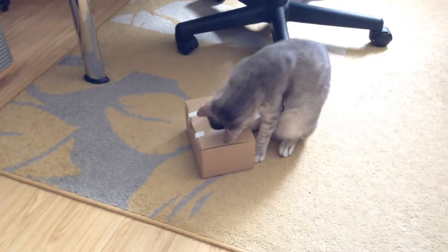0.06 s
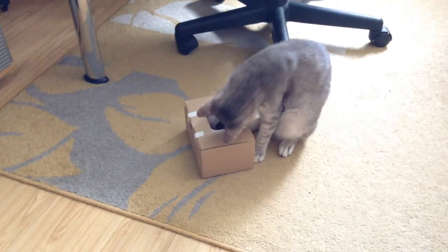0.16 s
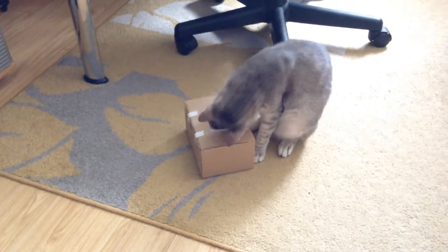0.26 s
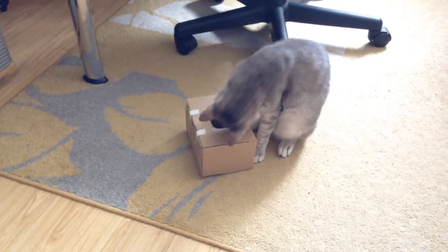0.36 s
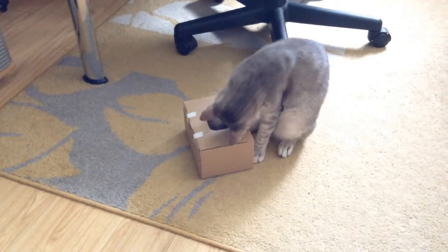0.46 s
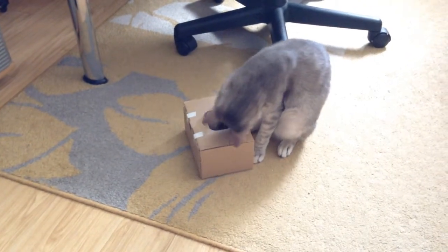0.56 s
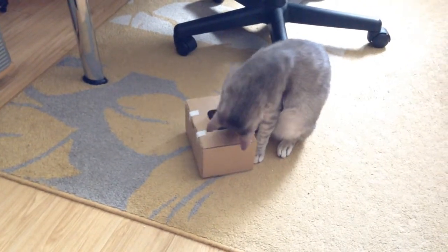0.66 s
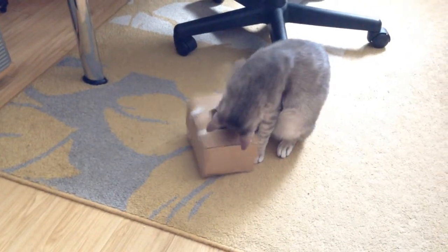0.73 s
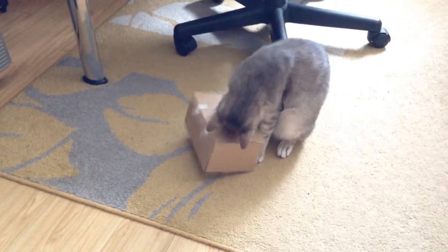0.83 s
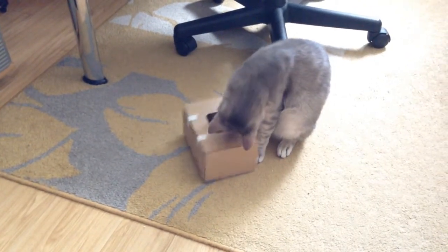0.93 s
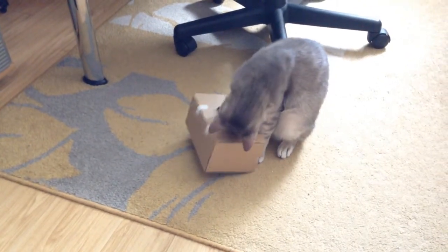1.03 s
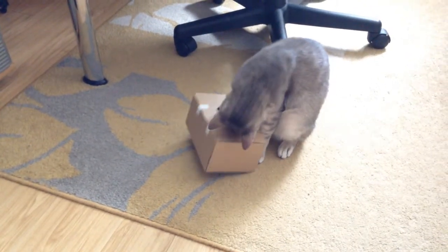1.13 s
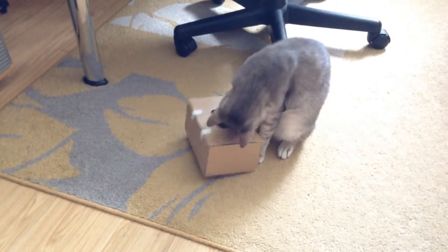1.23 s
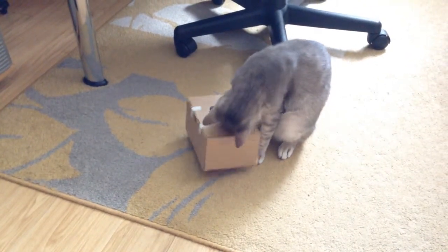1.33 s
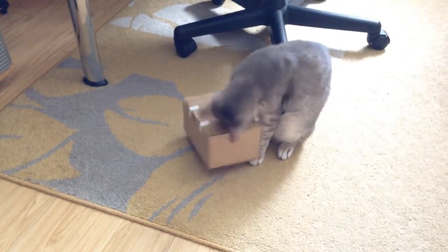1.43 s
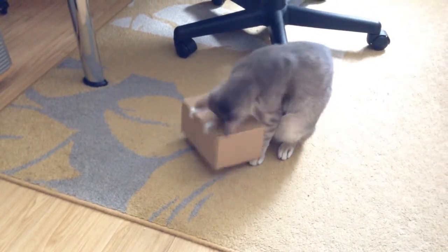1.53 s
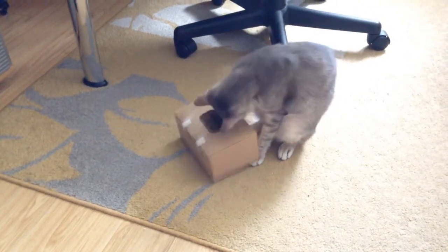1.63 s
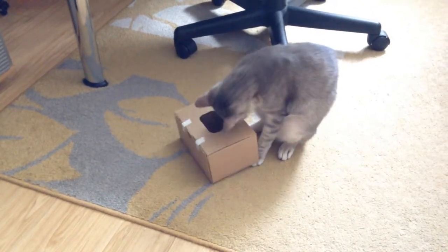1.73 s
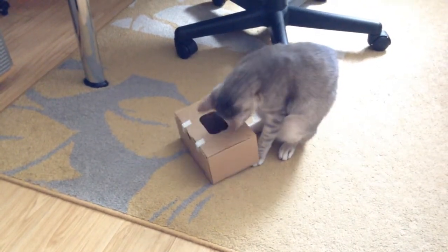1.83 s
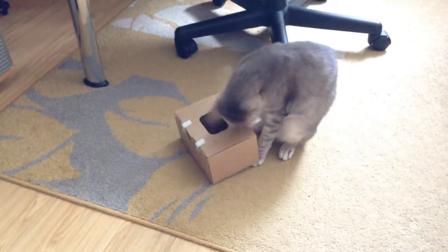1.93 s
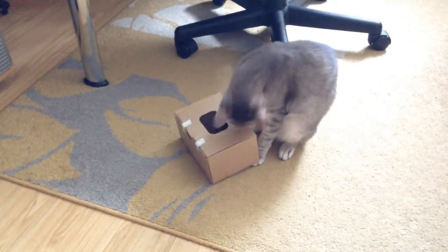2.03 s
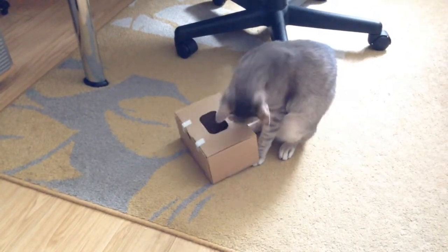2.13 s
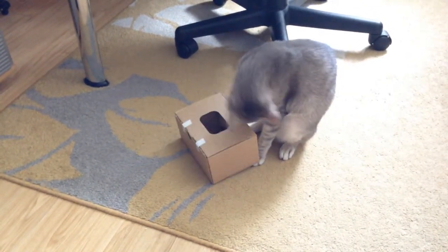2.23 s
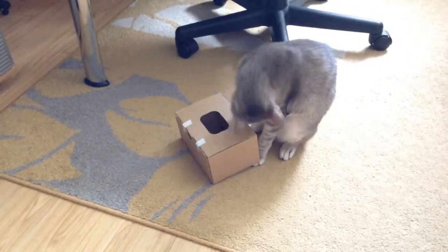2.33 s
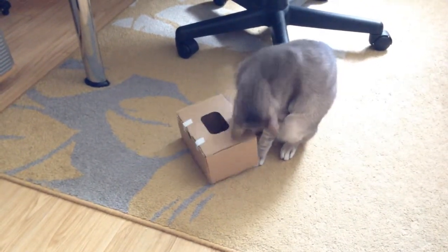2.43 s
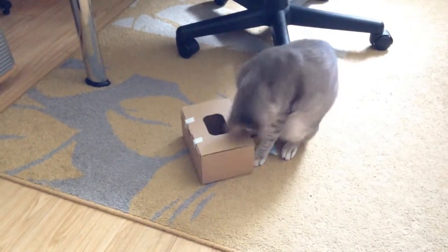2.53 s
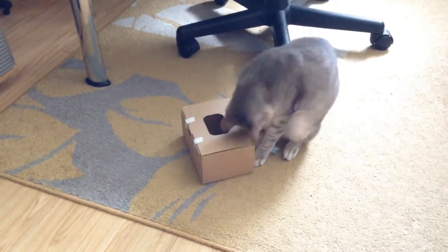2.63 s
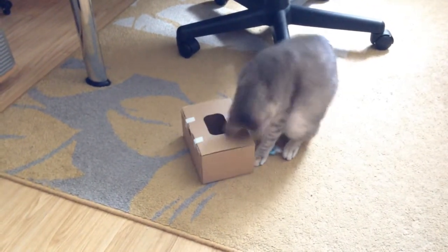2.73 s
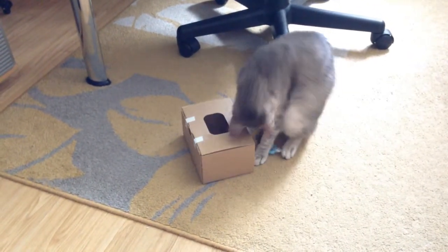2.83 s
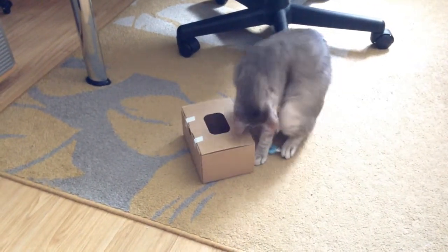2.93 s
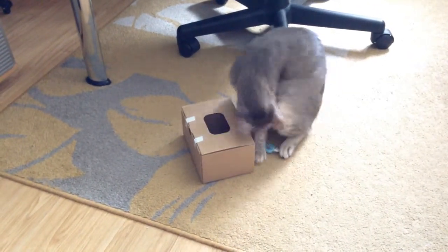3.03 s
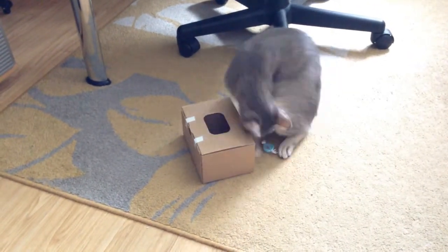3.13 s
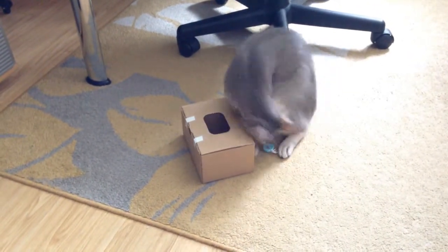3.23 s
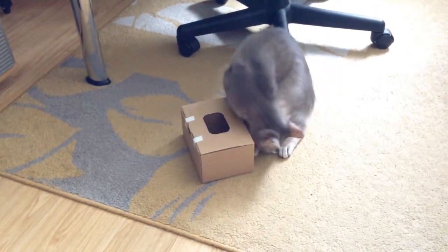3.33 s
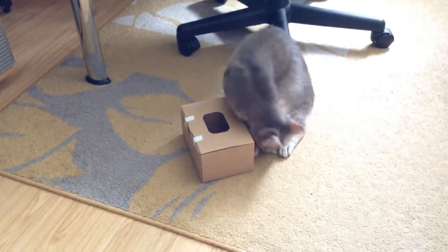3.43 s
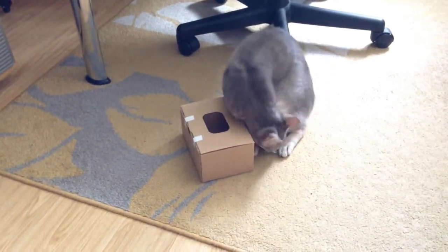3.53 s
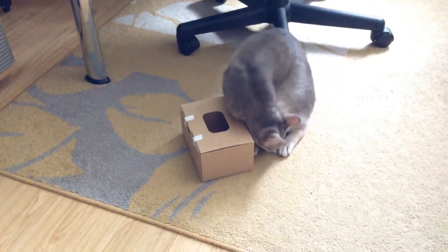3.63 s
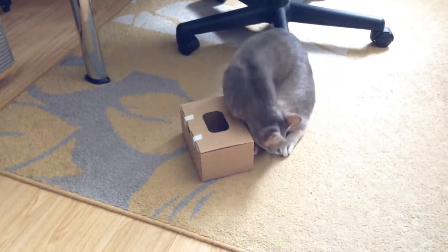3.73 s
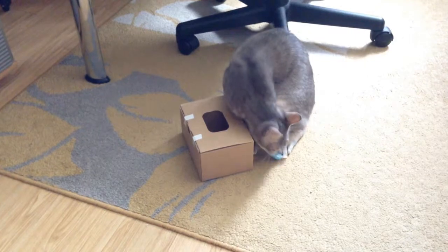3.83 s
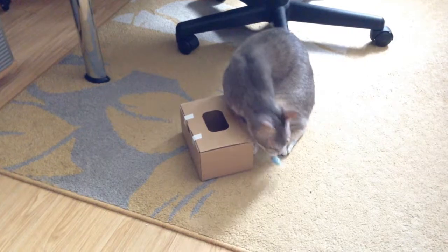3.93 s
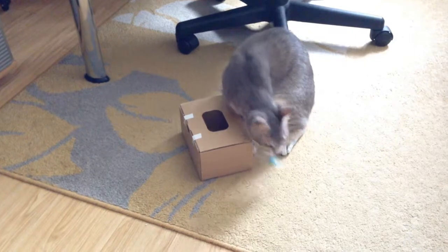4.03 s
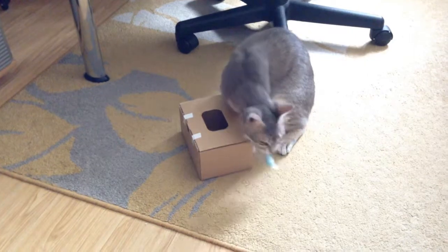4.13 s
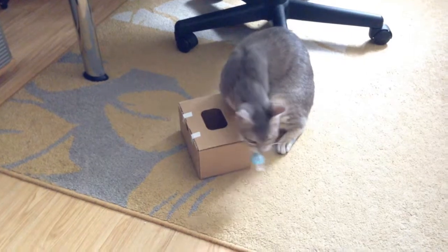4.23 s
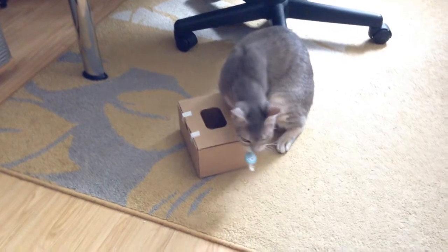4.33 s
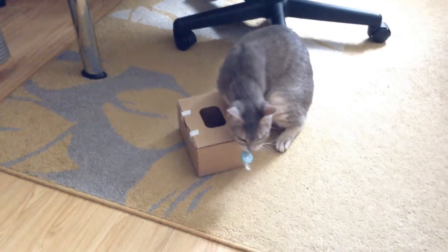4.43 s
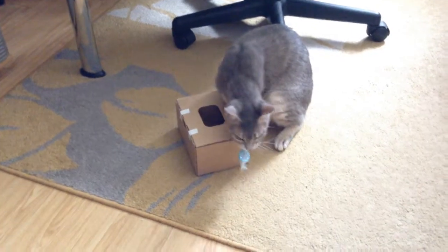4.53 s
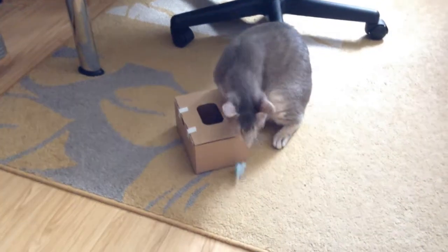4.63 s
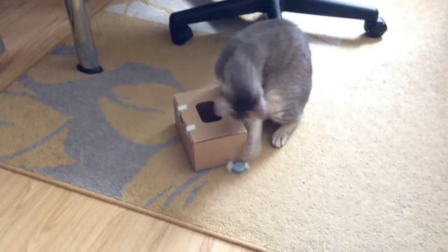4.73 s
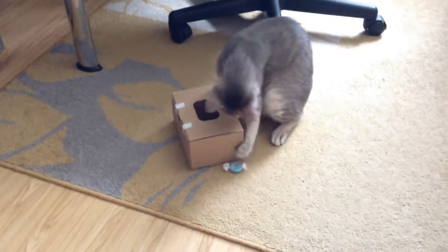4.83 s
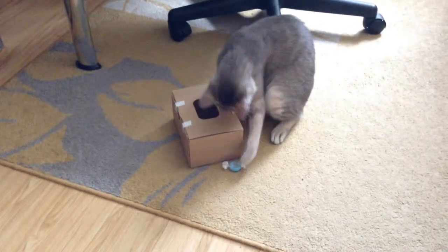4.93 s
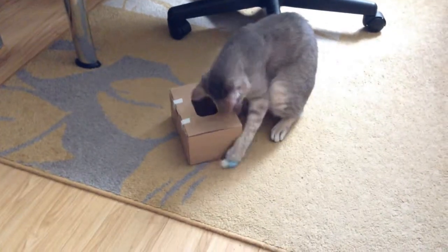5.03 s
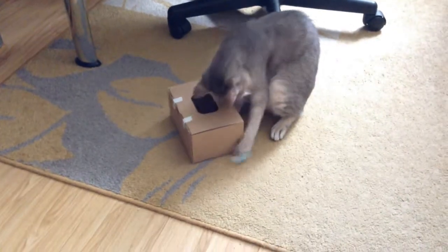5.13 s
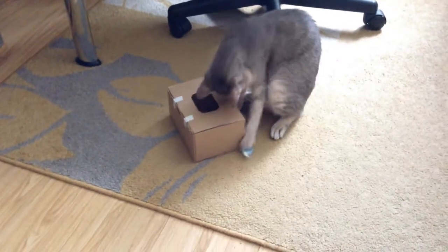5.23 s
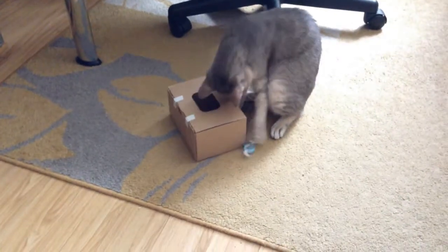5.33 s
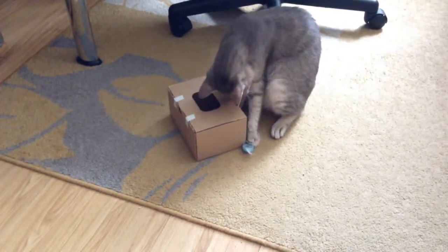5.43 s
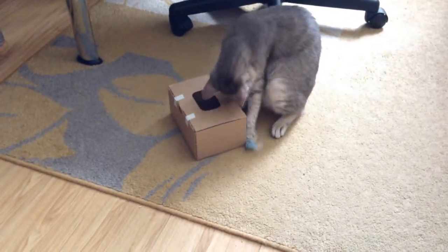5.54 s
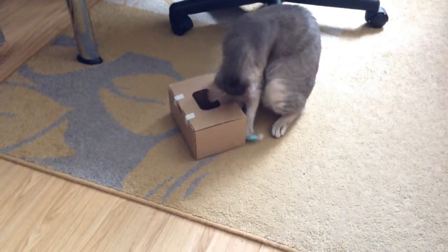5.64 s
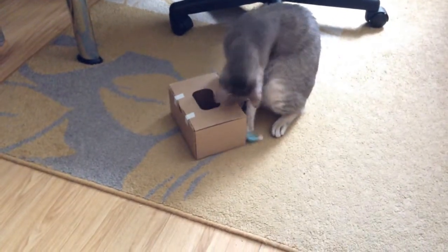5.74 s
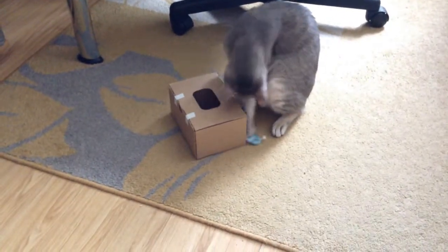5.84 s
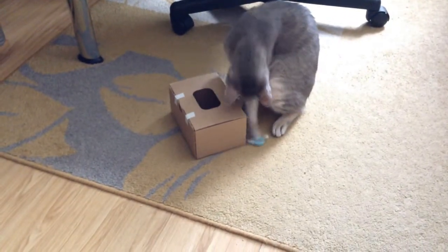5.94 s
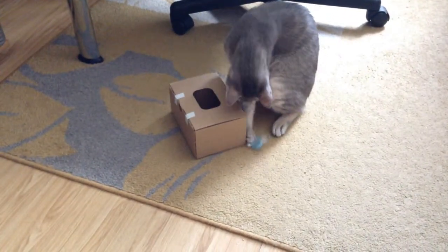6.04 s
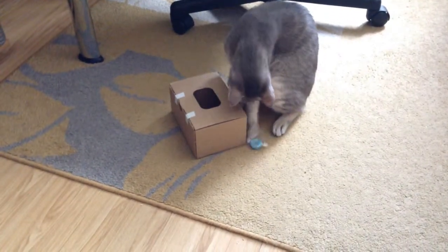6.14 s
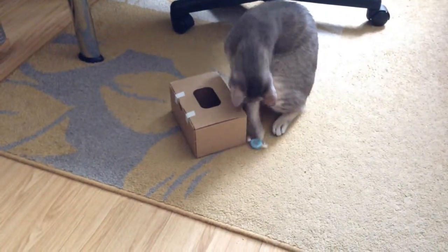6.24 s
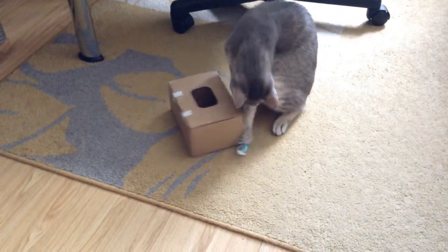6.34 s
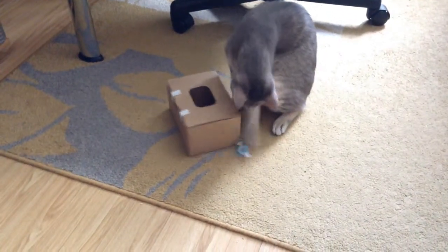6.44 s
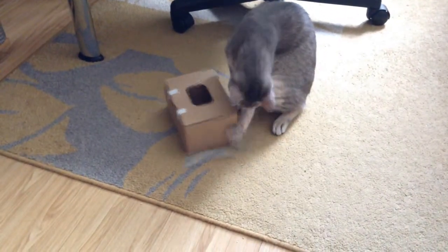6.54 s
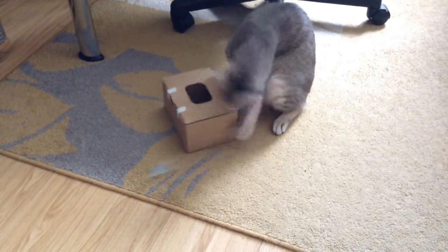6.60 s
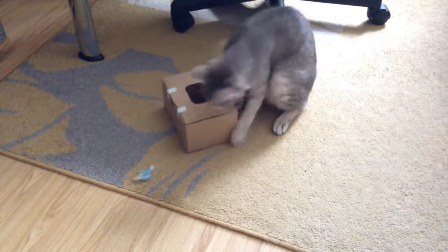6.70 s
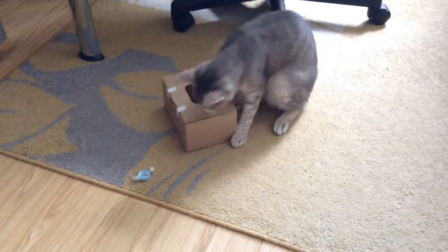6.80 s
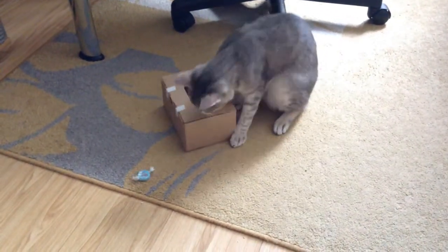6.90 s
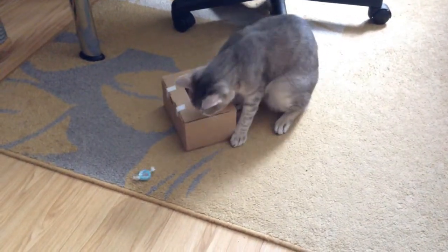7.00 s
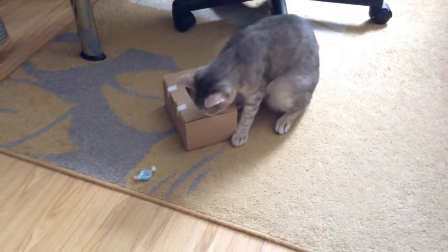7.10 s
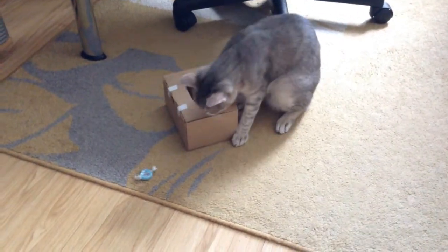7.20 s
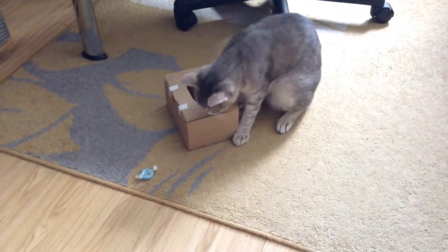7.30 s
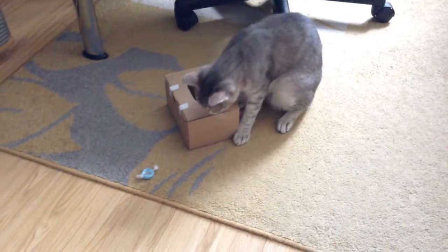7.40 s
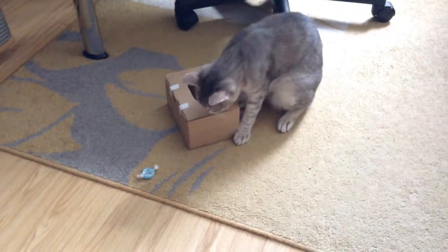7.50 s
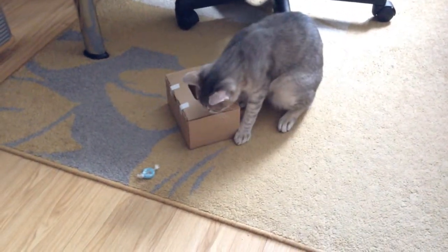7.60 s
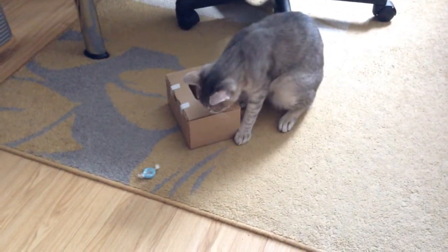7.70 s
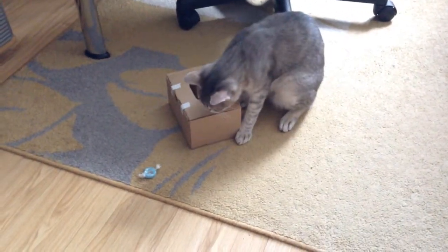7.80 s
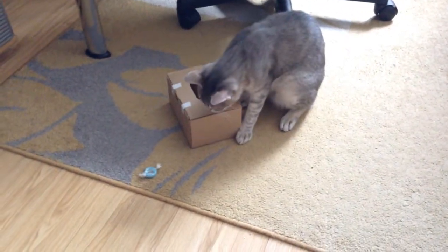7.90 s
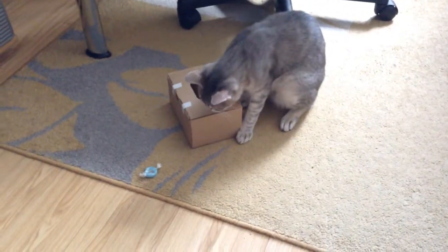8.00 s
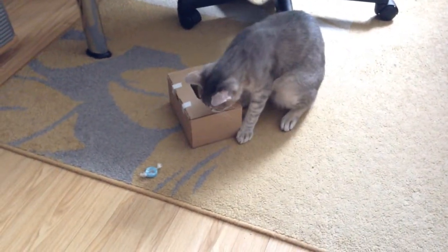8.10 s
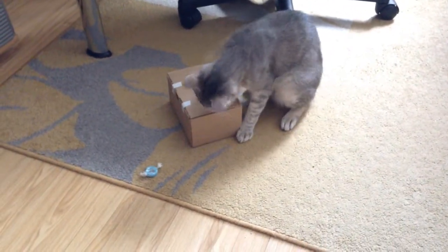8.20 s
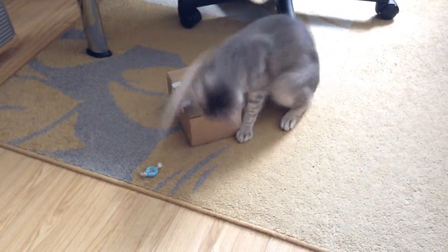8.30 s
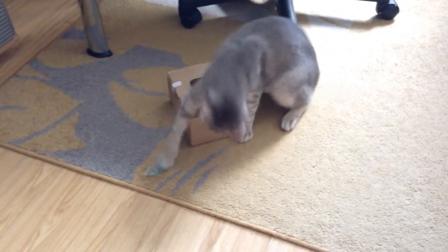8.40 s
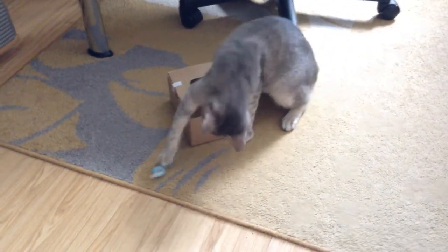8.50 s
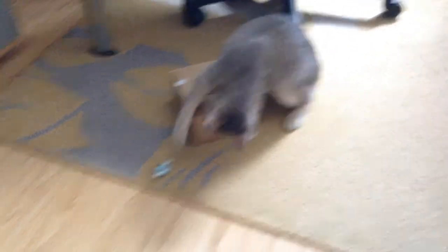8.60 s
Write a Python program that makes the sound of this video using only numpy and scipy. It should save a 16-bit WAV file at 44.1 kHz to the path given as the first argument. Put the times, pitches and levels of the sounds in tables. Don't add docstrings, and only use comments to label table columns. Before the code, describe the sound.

A cat's paw thumps and scrapes inside a small cardboard box, the box drops back, then a crinkly wrapped toy snaps and taps on a rug.

```python
import sys
import numpy as np
from scipy import signal
from scipy.fft import rfft, irfft
from scipy.io import wavfile
from scipy.ndimage import uniform_filter1d

SR = 44100
rng = np.random.default_rng(int(sys.argv[2]) if len(sys.argv) > 2 else 0)


def how_loud(loudness_db):
    steps = np.asarray(loudness_db, float) / 20
    return 10 ** steps


def materialize(psi):
    bounded = np.clip(np.atleast_2d(psi).T, -1, 1)
    quanta = np.round(bounded * 32767).astype(np.int16)
    wavfile.write(sys.argv[1], SR, quanta)


N = 381906
T = np.arange(N) / SR


def unit(x):
    return x / np.sqrt(np.mean(x ** 2) + 1e-30)


def band(x, lo_hz, hi_hz, order=2):
    edges = [lo_hz, min(hi_hz, .45 * SR)]
    return signal.sosfilt(signal.butter(order, edges, "band", fs=SR, output="sos"), x)


def ring(x, hz, width_hz):
    return signal.lfilter(*signal.iirpeak(hz, hz / width_hz, fs=SR), x)


def walk(rate_hz):
    hold = int(SR / rate_hz)
    steps = np.repeat(rng.standard_normal(N // hold + 1), hold)[:N]
    return unit(uniform_filter1d(steps, hold))


def add(out, s, x, db):
    i = int(s * SR)
    x = x[:N - i]
    out[i:i + len(x)] += x * how_loud(db) / np.max(np.abs(x))


# [f/Hz, level/dB per Hz]
AIR_COLOUR = [(15, -50), (25, -12), (195, -9.5), (249, -6.5), (373, -11), (439, -14), (489, -12.5),
              (796, -15.5), (1040, -17), (1840, -18), (2050, -19.5), (2610, -20), (3820, -21),
              (14000, -27.5), (16000, -32)]


def air(level_db=-64):
    hz, db = np.transpose(AIR_COLOUR)
    f = np.maximum(np.fft.rfftfreq(N, 1 / SR), 1)
    colour = how_loud(np.interp(np.log(f), np.log(hz), db))
    hiss = irfft(rfft(rng.standard_normal(N)) * colour, N)
    return hiss * how_loud(level_db + 0.039 * walk(2.1)) / np.std(band(hiss, 680, 22000))


# [f/Hz, level/dB rms]
FAN_TONES = [(253.0, -64.5), (317.6, -76.5), (430.7, -75), (753.7, -80.5), (807.5, -79.5), (2105, -79)]


def fan():
    out = np.zeros(N)
    for hz, db in FAN_TONES:
        pitch = hz * (1 + 0.00394 * walk(7.2))
        out += how_loud(db + walk(11)) * np.sin(2 * np.pi * np.cumsum(pitch) / SR)
    return np.sqrt(2) * out


def room(x, t60_s=0.24):
    t = T[:SR // 2]
    fall = np.exp(-np.log(1000) * t / t60_s)
    low = band(rng.standard_normal(len(t)), 77.2, 2500, order=1) * fall
    high = band(rng.standard_normal(len(t)), 3200, 12000, order=1) * fall
    tail = (unit(low) + 0.84 * unit(high)) * np.minimum(t / 0.0017, 1)
    return signal.fftconvolve(x, tail / np.sqrt(np.sum(tail ** 2)))[:N]


# [t/s, peak level/dB, f/Hz]
RUG_THUDS = [(0.03, -49, 188), (0.438, -41, 190), (0.832, -41, 184), (0.948, -43, 203), (1.099, -34.5, 211),
             (1.297, -43.5, 192), (1.678, -39.5, 225), (1.723, -31.5, 197), (1.852, -46, 187),
             (2.527, -51, 230), (2.615, -39.5, 175), (4.751, -44.5, 192), (5.117, -56, 135),
             (8.506, -53, 179), (8.599, -56, 80.7)]


def thuds(t60_s=0.076):
    out, t = np.zeros(N), T[:4000]
    for s, db, hz in RUG_THUDS:
        add(out, s, np.sin(2 * np.pi * hz * t) * np.exp(-np.log(1000) * t / t60_s), db)
    return out


def slipping(slips, scatter_db):
    sizes = how_loud(scatter_db * np.minimum(rng.exponential(size=N), 3))
    return unit((rng.random(N) < slips / SR) * rng.standard_normal(N) * sizes)


def stroke(t, part, off_db, s, rise, fall, db, bright):
    away = np.maximum((s - t) / max(rise, 1e-3), (t - s) / max(fall, 1e-3))
    return how_loud(db - off_db * (part - bright) ** 2 - 22 * np.minimum(away, 8))


def rub(strokes, off_db, body, edges_hz, slips, scatter_db, patchy_db, fur):
    whole = slipping(slips, scatter_db) + fur * rng.standard_normal(N)
    sound = np.zeros(N)
    for hz, width_hz, db in body:
        fold = whole + 1.4 * slipping(slips / 2, scatter_db)
        sound += how_loud(db) * unit(ring(ring(fold, hz, 1.07 * width_hz), hz, 5 * width_hz))
    out, t = np.zeros(N), T[::32]
    for part, (lo, hi) in enumerate(zip(edges_hz, edges_hz[1:])):
        gain = np.interp(T, t, sum(stroke(t, part, off_db, *row) for row in strokes))
        patches = how_loud(patchy_db * walk(60))
        out += uniform_filter1d(gain, size=100) * patches * unit(band(sound, lo, hi, order=3))
    return out


def snaps(rows, spread, wide_db, top_hz, ms, settle_db, low_hz):
    out, size = np.zeros(N), 2500
    for s, db, hz in rows:
        chance = rng.standard_normal(size)
        span = T[:size] / (ms * 0.0013) * (hz / 4000) ** 0.49
        crack = band(chance * span * np.exp(-2 * span), low_hz, top_hz, order=4)
        add(out, s, ring(ring(crack, hz, hz * spread), hz, hz * spread) + how_loud(wide_db) * crack, db)
        settle = ring(chance[::-1] ** 3 * np.exp(-T[:size] / 0.011), 3370, 1400)
        add(out, s + .002, settle, db + settle_db * (hz / 4000) ** .5)
    return out


def push(chance, ms):
    t = T[:len(chance)]
    return chance * np.exp(-t / (max(ms, .1) * 0.0014)) * np.minimum(t / 0.00085, 1)


# [f/Hz, level/dB, t60/s]
BOX_MODES = [(351, 7, 0.25), (435, 5, 0.097), (500, 3, 0.069), (557, 1, 0.06), (616, 2, 0.05),
             (696, -12, 0.138), (735, 0, 0.24), (820, -3, 0.31), (826, -17, 0.13), (871, -22, 0.25),
             (1030, -18, 0.13), (1204, 8.5, 0.078)]


def knocks(rows, rap_hz, spread=0.41, modes_db=-6, rap_spread=0.74, strike=1.24):
    out, size = np.zeros(N), 6000
    t = T[:size]
    for s, db, hz, rap_db, ms in rows:
        firm = strike * np.exp(-((t - .0012) / 0.000099) ** 2)
        blow = push(rng.standard_normal(size), ms) + firm
        thump = ring(ring(ring(blow, hz, hz * spread * 2), hz, hz * spread * 2), hz, hz * spread * 3)
        modes = np.zeros(size)
        for f, mode_db, t60 in BOX_MODES:
            near = how_loud(mode_db) / (1 + (np.log2(f / hz) / 1.7) ** 2)
            modes += near * unit(ring(blow, f, 2.8 / t60))
        add(out, s, unit(thump) + how_loud(modes_db) * unit(modes), db)
        rap = band(blow * np.exp(-t / 0.03), 910, 2780)
        add(out, s, ring(rap, rap_hz, rap_hz * rap_spread), db + rap_db)
    return out


# [t/s, peak level/dB, centre f/Hz]
FAINT_TICKS = [(.051, -47, 3900), (.1705, -44, 6400), (.286, -44, 6300), (.545, -46, 5000),
               (.642, -47, 4200), (.775, -42, 3700), (4.65, -47, 3400), (4.6505, -45, 6300),
               (4.755, -49, 5500), (4.852, -52, 9000), (4.853, -51, 6900), (4.866, -46, 6300),
               (5.088, -42, 6000), (5.107, -42, 4000), (5.126, -45, 6800), (5.1424, -42, 11000),
               (5.232, -43, 3900), (5.233, -53, 9000), (5.667, -43, 3800), (5.67, -46, 8000),
               (5.686, -44, 8500), (5.698, -51, 5500), (5.7335, -40, 3200), (5.753, -46, 7800),
               (5.774, -42, 8500), (5.897, -46, 3200), (5.963, -50, 4300), (5.975, -49, 5470),
               (6.523, -46, 7000), (6.59, -45, 7500), (6.601, -37, 7600), (6.686, -38, 7000),
               (8.53, -35, 6800), (8.513, -40, 8200), (8.521, -37, 4000), (8.636, -40, 6500),
               (8.553, -44, 6000), (6.663, -39, 5500), (1.603, -41, 5000), (1.641, -33, 3600),
               (1.678, -42, 5800), (1.728, -41, 6000), (1.746, -40, 5200), (1.767, -40, 6500),
               (1.797, -47, 5500), (1.822, -41, 4700), (1.843, -43, 6300), (1.88, -46, 5000),
               (1.928, -47, 6200), (1.975, -49, 6500), (2.531, -43.5, 6300), (2.648, -45, 5000),
               (2.76, -46, 6200), (2.783, -48, 6500), (2.956, -48, 3200), (.99, -41, 4000),
               (1.048, -41, 3300), (.098, -41, 4000), (.118, -41, 3100)]


def ticks():
    return snaps(FAINT_TICKS, spread=0.52, wide_db=-12, top_hz=15100, ms=1.04, settle_db=-16, low_hz=2900)


# [loudest t/s, rise/s, fall/s, level/dB, fold f/Hz]
FOLD_GRAZES = [(0.0021, 0.014, 0.056, -43.5, 1485), (.008, .02, .04, -48, 4200),
               (0.12, 0.047, 0.087, -46, 755), (0.11, .05, .07, -47.5, 4080),
               (0.114, 0.027, .04, -53, 6100), (0.168, .05, 0.034, -53, 2250),
               (0.373, .025, .09, -41, 1550), (0.388, 0.046, .03, -49, 3630), (.478, .03, 0.12, -34, 790),
               (0.467, 0.063, 0.099, -38.5, 380), (0.572, .04, 0.013, -45, 770),
               (.693, 0.018, 0.06, -33, 1530), (.697, 0.016, 0.018, -45, 4000),
               (.795, 0.034, 0.034, -32, 610), (0.8, .06, .04, -47, 2340), (.835, 0.025, 0.038, -44, 1660),
               (.828, 0.017, 0.049, -48, 2530), (0.74, 0.037, 0.027, -57, 5200),
               (1.03, .015, .015, -51.5, 6400), (1.108, 0.013, 0.028, -35, 1620),
               (1.1, 0.023, .05, -43, 960), (1.258, .02, 0.027, -45, 1180), (3.16, 0.03, 0.06, -45, 1700),
               (3.155, 0.018, 0.023, -48, 4100), (3.162, 0.027, 0.022, -43, 3030),
               (4.809, 0.006, 0.015, -52, 1550), (4.829, 0.05, 0.0088, -51, 776),
               (4.91, .02, .06, -62, 3300), (5.803, .012, 0.04, -61, 950), (5.81, .08, .06, -59, 2400),
               (5.74, .03, 0.2, -54, 3250), (5.75, .03, .13, -54, 1650), (6.652, 0.004, .08, -49, 2230),
               (6.69, 0.034, 0.022, -47, 2570), (6.73, .03, 0.048, -59, 2200),
               (6.68, .04, 0.032, -52, 4100), (6.73, 0.023, .03, -56, 530),
               (6.425, .01, 0.055, -49.5, 1020), (2.638, 0.025, 0.05, -58, 1500),
               (1.724, 0.015, 0.038, -42, 1290),
               (1.648, .008, .04, -42, 2740), (1.64, .012, .05, -45, 1300), (1.604, .006, .03, -52, 3300),
              (1.727, 0.018, 0.023, -46, 690), (1.82, .04, 0.046, -54, 4400), (1.798, .005, .05, -56, 2300),
              (1.848, 0.044, 0.013, -44, 470), (2.53, .04, .04, -63, 3300), (1.249, .015, .015, -45, 2000),
              (2.69, .03, .025, -63, 1520), (0.267, .015, 0.043, -54, 200), (.72, .015, .08, -43.5, 198),
              (1.062, .02, .03, -39, 750), (1.12, .015, .015, -37, 510), (4.892, .003, .02, -47.5, 3300),
              (6.69, .04, .07, -53, 620), (1.152, 0.024, 0.038, -42, 620), (1.155, .025, .04, -46, 1100),
              (1.075, .02, .015, -40, 920), (.97, .015, 0.035, -47, 1900), (.433, .02, .004, -40, 760),
              (1.1, .03, 0.028, -41, 680), (1.105, .006, 0.027, -38, 2100)]


def grazes(spread=.08, slips=1200, fur=.6):
    out, size = np.zeros(N), 16000
    drag = slipping(slips, 2.4) + fur * rng.standard_normal(N)
    for k, (s, rise, fall, db, hz) in enumerate(FOLD_GRAZES):
        at = slice(max(int(s * SR) - size // 3, 0), int(s * SR) + size * 2 // 3)
        piece = np.roll(drag, 9001 * k)[at]
        fold = ring(ring(piece, hz, hz * spread), hz, 3 * hz * spread)
        out[at] += unit(fold) * stroke(T[at], 0, 0, s, rise, fall, db, 0)
    return out


# [t/s, peak level/dB, struck panel f/Hz, edge rap level/dB, push length/ms]
TOY_TAPS = [(2.756, -44, 2270, -21, 3), (2.772, -47, 2380, -19, 2.7), (3.042, -33.5, 566, -31, 6),
            (3.139, -40, 1100, 5, 2.6), (3.155, -51, 1030, 9, 3), (4.089, -61, 568, 9, 3),
            (4.751, -42.5, 410, -20, 3), (4.803, -33.5, 610, -26, 1.5), (4.891, -50, 880, 8, 2.7),
            (5.259, -59, 310, 15, 3.2), (5.328, -47.5, 870, 6.5, 3), (5.734, -48, 1060, 8, 6),
            (5.992, -62, 360, 12, 8), (6.148, -44.5, 1160, 0, 4), (6.407, -38, 1090, 13, 4),
            (6.422, -45, 950, -11, 4), (6.537, -52, 556, 0, 3), (6.72, -47.5, 527, -1, 2.8),
            (8.519, -54, 428, 16.5, 4)]


def toy_taps():
    return knocks(TOY_TAPS, rap_hz=1470, spread=0.29, modes_db=-6.5, rap_spread=0.53, strike=2.5)


# [loudest t/s, rise/s, fall/s, level/dB, brightness 0 body - 1 rasp - 2 hiss]
FILM_STROKES = [(3.14, 0.0033, 0.052, -47.5, 0.2), (3.161, 0.029, 0.041, -52.5, 0.57),
                (3.75, .04, 0.06, -60, 0.45), (3.875, 0.24, .15, -61.5, 1.64), (5.2, 0.4, 0.4, -63.5, .2),
                (5.68, 0.046, 0.34, -61, 1.8), (5.74, 0.08, 0.16, -54, 0.65),
                (5.81, 0.14, 0.066, -54, 0.074), (5.91, .03, 0.16, -55, 1.2),
                (6.12, 0.097, 0.064, -59, 1.65), (6.15, 0.018, 0.031, -53.5, .1),
                (6.408, 0.0045, 0.018, -35, 0.22), (6.521, .025, 0.012, -52, 1.6),
                (6.605, 0.028, 0.008, -42.5, 2.1), (6.65, .003, 0.11, -48.5, 0.75),
                (6.672, 0.03, 0.05, -46, 0.41), (6.678, .003, 0.037, -44, 2.2),
                (8.515, .012, 0.064, -47, 0.83), (8.52, 0.016, 0.036, -47, 2.3),
                (8.629, .005, 0.016, -43, 1.5)]
# [f/Hz, width/Hz, level/dB]
TOY_BODY = [(960, 890, -8), (1647, 230, -5.5), (2380, 810, -10), (3350, 760, -1), (4500, 4100, -2),
            (7640, 3300, -10), (10600, 3400, -19)]


def film_rustle():
    return rub(FILM_STROKES, 10, TOY_BODY, (700, 2700, 6000, 16000),
               slips=2600, scatter_db=1.6, patchy_db=2.2, fur=.7)


# [t/s, peak level/dB, centre f/Hz]
FILM_FOLDS = [(2.0946, -48, 3640), (2.3431, -49, 3950), (2.5292, -48, 4000), (2.6155, -46, 4450),
              (2.67, -46, 4470), (2.805, -35, 4500), (3.156, -44, 3050), (3.7296, -47, 5200),
              (3.7537, -47, 3800), (3.9554, -46, 9500), (3.878, -38.5, 3330), (3.917, -39.5, 3200),
              (4.6394, -37.5, 5600), (4.8036, -34, 4000), (4.8919, -34.5, 3250), (5.0988, -42, 3940),
              (5.1425, -43, 4080), (5.2195, -41.5, 3470), (5.2455, -44, 3900), (5.2588, -39.5, 3930),
              (5.3303, -45.5, 3230), (5.5298, -43.5, 3280), (6.194, -43.5, 4030), (6.3611, -38.5, 3400),
              (6.378, -41.5, 4640), (6.4078, -32.5, 3330), (6.518, -44, 3590), (6.658, -50, 3520),
              (6.365, -37, 9000), (6.8185, -39, 3330)]
# [t/s, peak level/dB, centre f/Hz]
FILM_POPS = [(2.373, -48, 6310), (2.7482, -47, 8000), (3.6127, -46.5, 3320), (4.1633, -38, 10600),
             (4.2897, -40.5, 6890), (4.3061, -40, 5760), (4.3848, -40.5, 10000), (4.791, -43, 6100),
             (4.8137, -29, 5440), (4.8717, -46, 6480), (5.0925, -30.5, 9400), (5.1588, -35.5, 9710),
             (5.369, -42, 5800), (5.4274, -45.5, 4440), (5.5431, -36, 7250), (5.6133, -30, 10400),
             (5.9587, -39.5, 5390), (6.054, -41.5, 5990), (6.1078, -41, 6110), (6.1242, -35, 6300),
             (6.2502, -43.5, 4980), (6.4173, -23, 10000), (6.431, -43, 8000), (6.501, -46, 9500),
             (6.602, -38, 9500), (6.6068, -29, 6500), (8.507, -29, 8700), (8.5174, -27.5, 8260),
             (8.5365, -28, 9800), (8.6297, -32, 6200)]


def film_snaps():
    pops = snaps(FILM_POPS, spread=0.78, wide_db=-4, top_hz=15400, ms=0.87, settle_db=-13.5, low_hz=2900)
    folds = snaps(FILM_FOLDS, spread=0.98, wide_db=-10.5, top_hz=11300, ms=0.94, settle_db=-10, low_hz=2930)
    return pops + folds


# [t/s, peak level/dB, struck panel f/Hz, edge rap level/dB, push length/ms]
BOX_ROCKS = [
    (1.481, -47, 514, -25, 2.4),
    (1.602, -50, 920, 5, 3),
    (1.634, -33, 744, 3, 10),
    (1.694, -35, 480, -15, 6),
    (1.721, -24, 810, -3.5, 3.7),
    (1.796, -39, 500, -1, 8),
    (1.849, -38.5, 413, -10, 3.7),
    (2.615, -38, 450, -7, 6),
    (2.629, -41.5, 370, 0.5, 2.5),
]


def box_rocks():
    return knocks(BOX_ROCKS, rap_hz=1120, strike=0.39)


# [loudest t/s, rise/s, fall/s, level/dB, brightness 0 body - 1 rasp - 2 hiss]
PAW_STROKES = [(0.01, 0.14, 0.038, -37.5, 1), (0.09, 0.066, 0.082, -47.5, 2.5),
               (0.13, 0.16, 0.14, -48, 1.2), (0.256, .004, 0.19, -51, 1.9), (0.365, 0.015, 0.13, -45, 0.8),
               (0.405, 0.061, 0.07, -47.5, 0.96), (0.437, 0.0045, 0.097, -37, -0.36),
               (0.46, 0.075, 0.8, -52.5, 1.5), (0.679, 0.0032, 0.055, -51, 0.7),
               (0.697, 0.012, 0.026, -44, 0.56), (0.78, 0.13, 0.25, -41, -0.18),
               (0.82, 0.14, 0.093, -46, 1.8), (0.957, 0.013, 0.22, -43, 1.1),
               (1.102, 0.0037, 0.19, -39.5, -1), (1.252, 0.03, 0.067, -49, 2), (1.52, .15, 0.2, -57, 1.1),
               (1.638, 0.15, 0.2, -48, 1.6), (1.73, 0.19, 0.083, -47, -0.5),
               (1.83, 0.17, 0.19, -51.5, 1.53), (2.62, 0.03, 0.16, -55, 0.3), (2.63, .3, .3, -59, 1.8)]
# [f/Hz, width/Hz, level/dB]
BOX_BODY = [(342, 87, 0), (530, 280, 13), (760, 220, 4), (1240, 200, 3), (1585, 146, 8), (2100, 520, -7),
            (3500, 1560, -8.5), (4000, 350, -23.5), (6200, 1050, -11.5), (9400, 2600, -15)]


def paw_scrapes():
    return rub(PAW_STROKES, 7.5, BOX_BODY, (250, 1100, 2700, 15000),
               slips=1100, scatter_db=2.2, patchy_db=3, fur=.45)


# [t/s, peak level/dB, centre f/Hz]
CLAW_SNAPS = [(0.0744, -40, 4300), (0.081, -33, 4270), (0.178, -42, 4480), (0.2537, -52, 3000),
              (0.3894, -39, 3800), (0.4604, -34, 3700), (0.4354, -33.5, 3500), (0.586, -45, 3860),
              (0.6943, -31, 4070), (0.7036, -29, 3500), (0.7565, -35, 4000), (0.811, -37, 3730),
              (0.823, -31, 3160), (0.9068, -43, 5850), (0.9682, -43, 4010), (1.029, -43, 6500),
              (1.077, -38, 5800), (1.1001, -27.5, 3860), (1.2489, -34.5, 3350), (1.2966, -46, 3260),
              (1.622, -40, 6200), (1.634, -32.5, 6550), (1.6384, -41, 6600), (1.675, -49, 3000),
              (1.7274, -41, 3520), (1.7502, -42, 3230), (1.8123, -43, 6600)]


def claw_snaps():
    return snaps(CLAW_SNAPS, spread=0.45, wide_db=-24, top_hz=11000, ms=3.14, settle_db=-5, low_hz=2610)


# [t/s, peak level/dB, struck panel f/Hz, edge rap level/dB, push length/ms]
PAW_KNOCKS = [(0.096, -35, 740, -7, 6.7), (0.254, -23, 420, -3, 4.6), (0.261, -22.5, 610, 6, 1.8),
              (0.362, -37, 1070, 3, 3.3), (0.39, -36.5, 400, 3, 5.5), (0.435, -9.5, 718, -12, 2.1),
              (0.448, -30, 735, -22, 1.5), (0.461, -12, 780, -10, 1.4), (0.474, -28, 756, -22, 4),
              (0.514, -31, 755, -17, 4.6), (0.677, -26, 900, 9, 1.3), (0.689, -29, 870, 2, 7.6),
              (0.702, -8.5, 610, -14, 1.2), (0.716, -14, 640, -12, 1.6), (0.763, -22, 610, -12, 3.3),
              (0.799, -25, 616, -5.5, 3.3), (0.824, -28.5, 530, -1, 8.5), (0.957, -37.5, 570, 5, 3.4),
              (0.99, -29, 590, -4, 7), (1.048, -21.5, 540, -13, 7), (1.099, -20, 540, 2.5, 5.3),
              (1.107, -18.5, 504, 0, 2.3), (1.251, -32, 876, 2.5, 5), (1.296, -37.5, 610, -2, 5.8)]


def paw_knocks():
    return knocks(PAW_KNOCKS, rap_hz=1220)


def scene():
    still = air() + fan()
    small = ticks() + grazes()
    taps = toy_taps()
    toy = film_rustle() + film_snaps()
    box = thuds() + box_rocks() + paw_scrapes() + claw_snaps() + paw_knocks()
    echoes = room(how_loud(-8.5) * box + how_loud(-11.5) * toy + how_loud(-11.5) * taps)
    return (still + small + how_loud(-13) * room(small) + taps + toy + box + echoes)[None]


def roll_off(x):
    return signal.sosfilt(signal.butter(12, 16470, fs=SR, output="sos"), x)


def record(dry):
    heard = band(dry - .5 * ring(dry, 2764, 300), 45, 19000, order=3)
    heard = signal.sosfilt(signal.ellip(8, .2, 60, 15400, fs=SR, output="sos"), heard)
    return roll_off(heard)


dry = scene()
out = record(dry)
materialize(out)
```